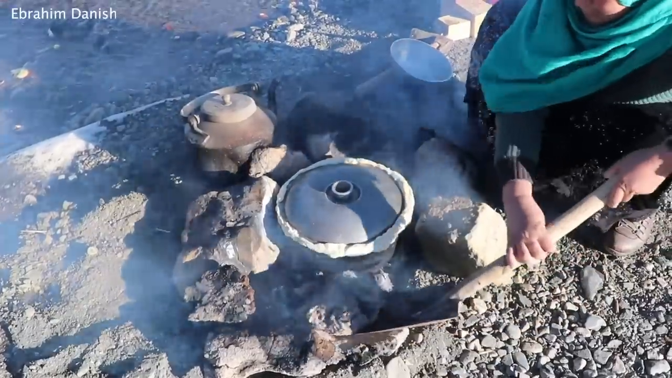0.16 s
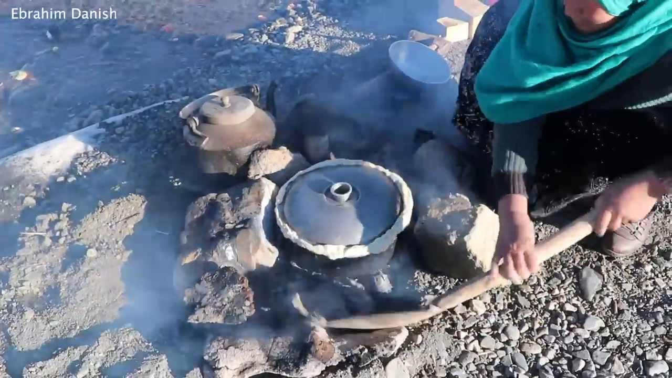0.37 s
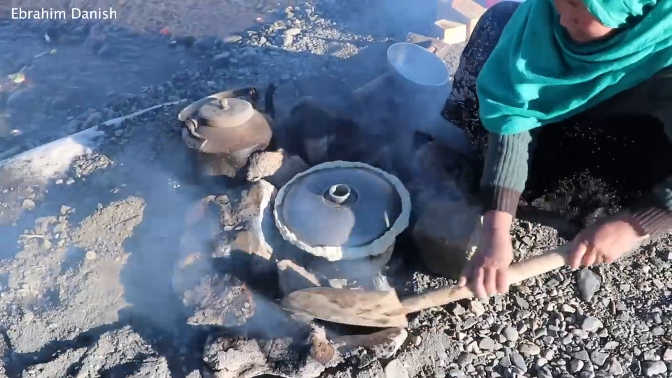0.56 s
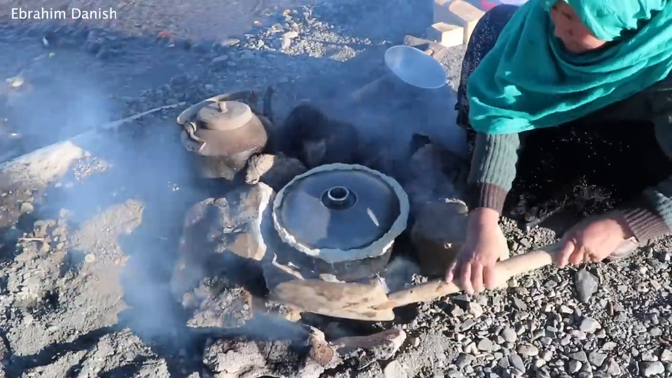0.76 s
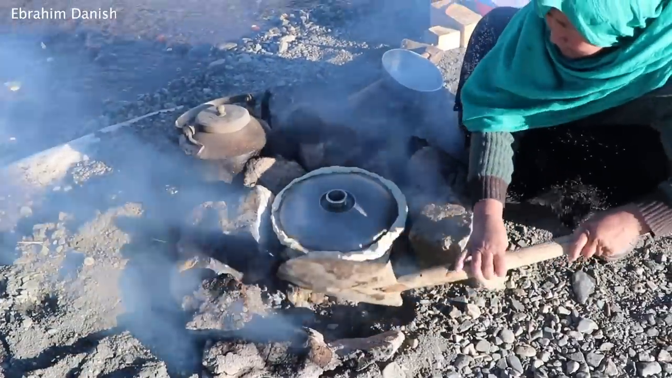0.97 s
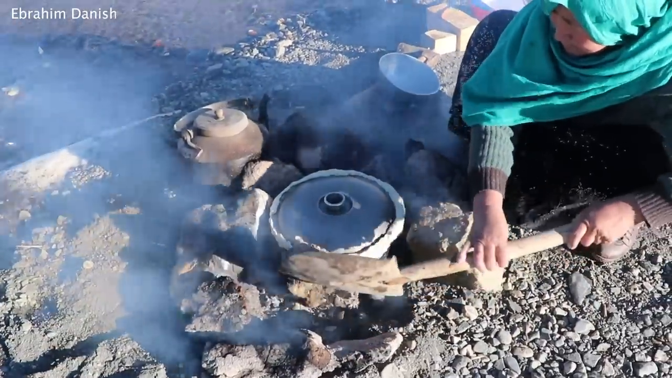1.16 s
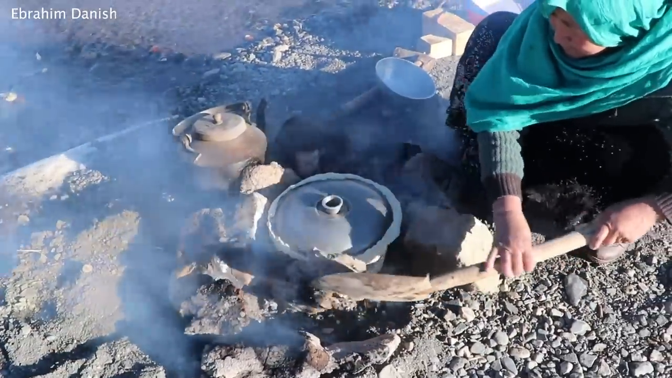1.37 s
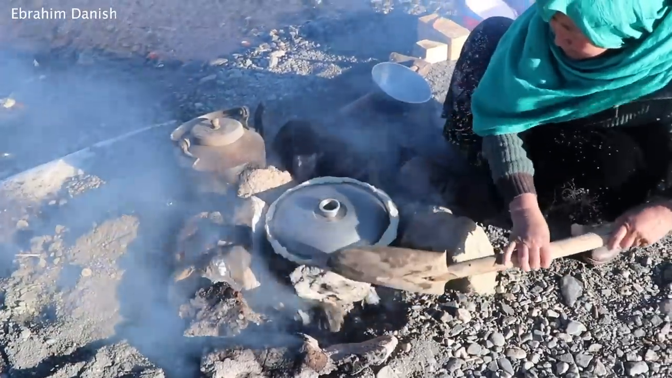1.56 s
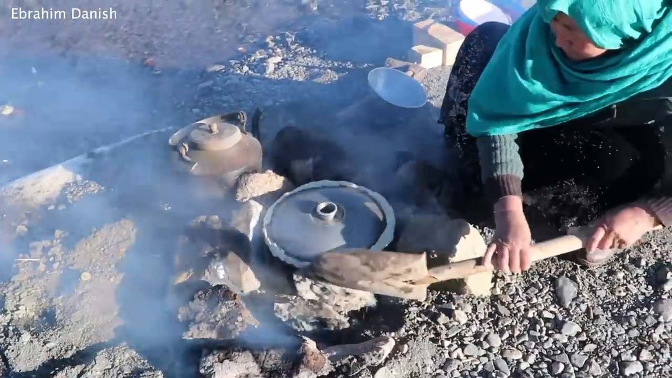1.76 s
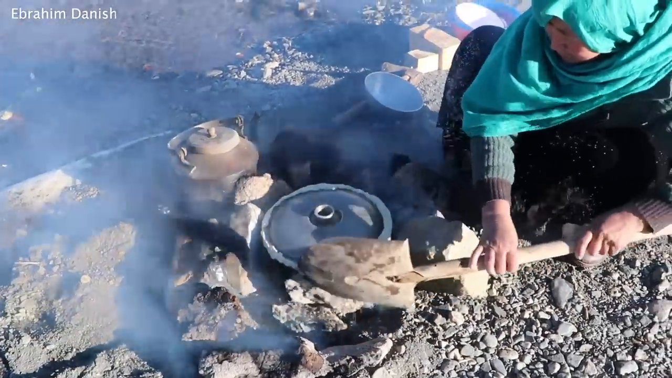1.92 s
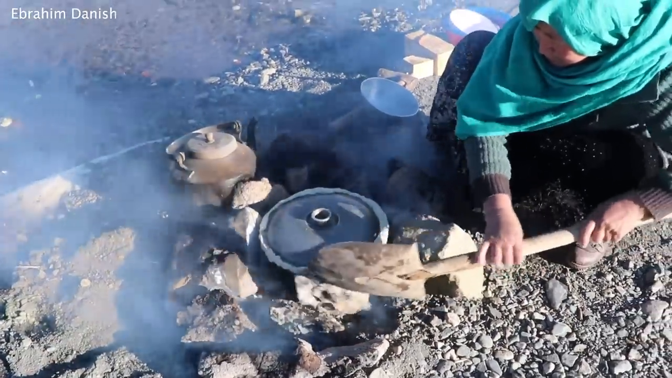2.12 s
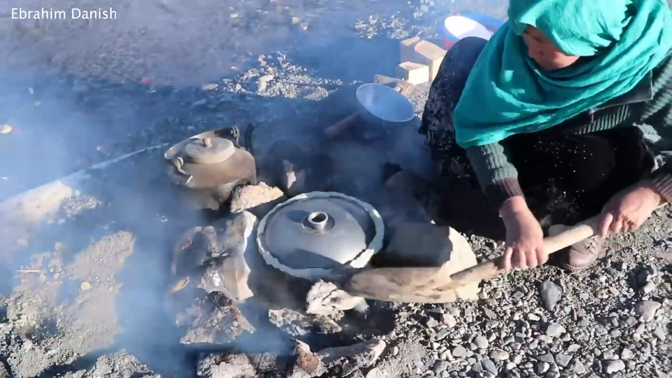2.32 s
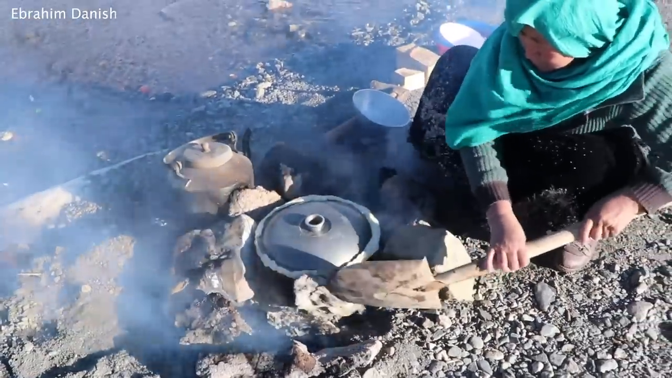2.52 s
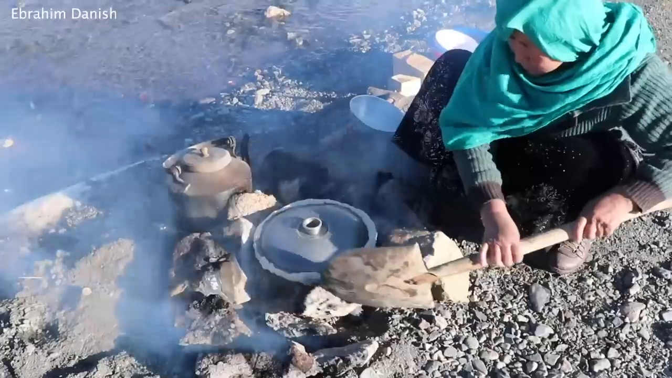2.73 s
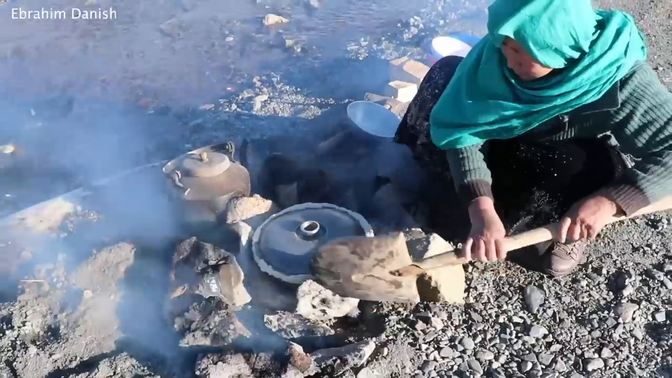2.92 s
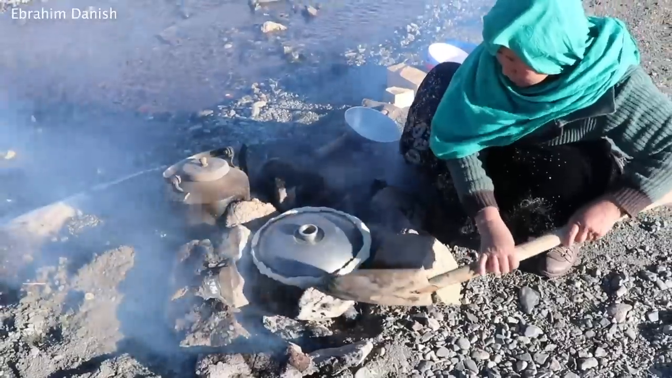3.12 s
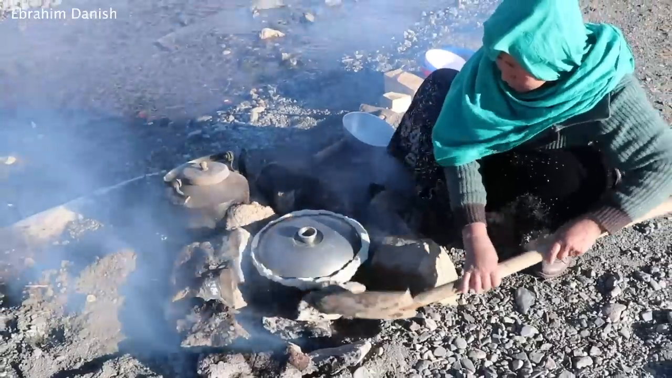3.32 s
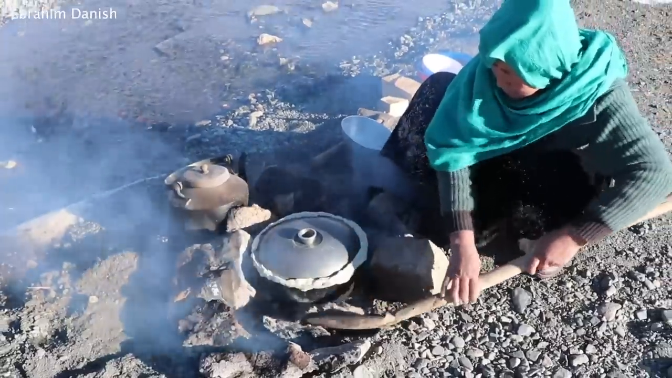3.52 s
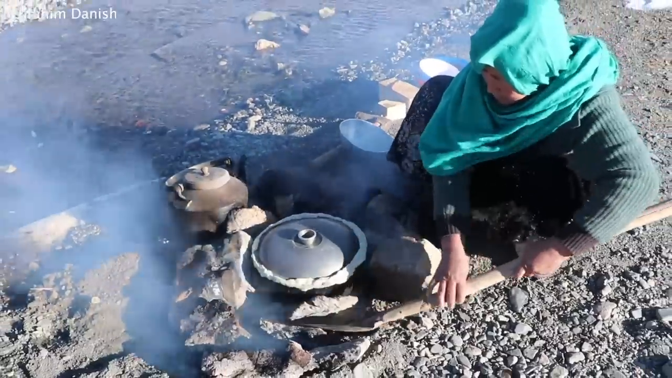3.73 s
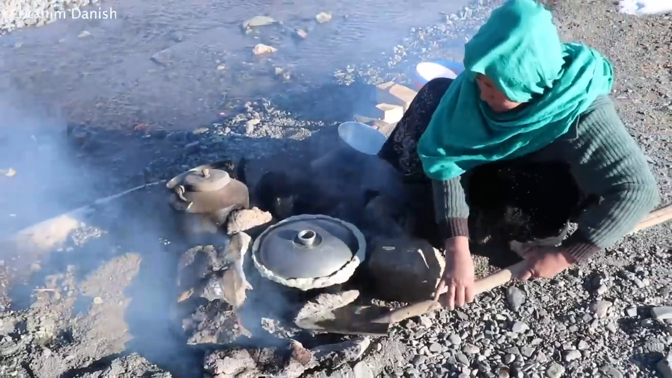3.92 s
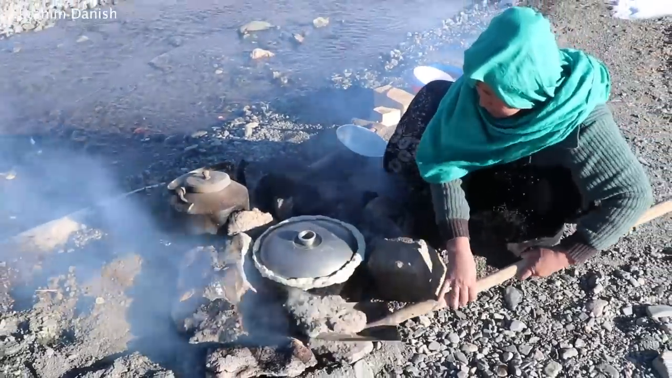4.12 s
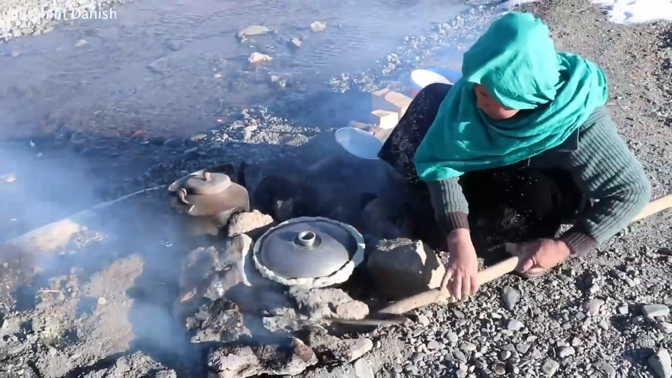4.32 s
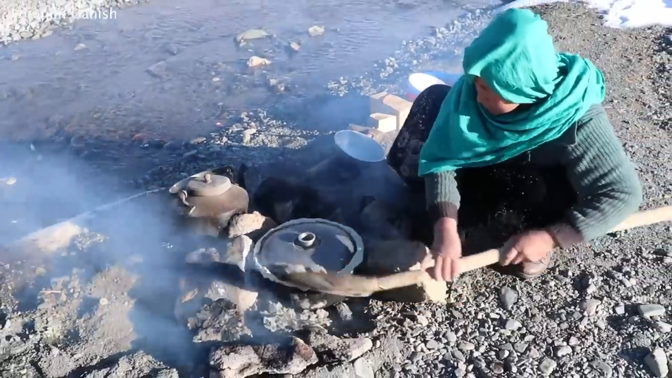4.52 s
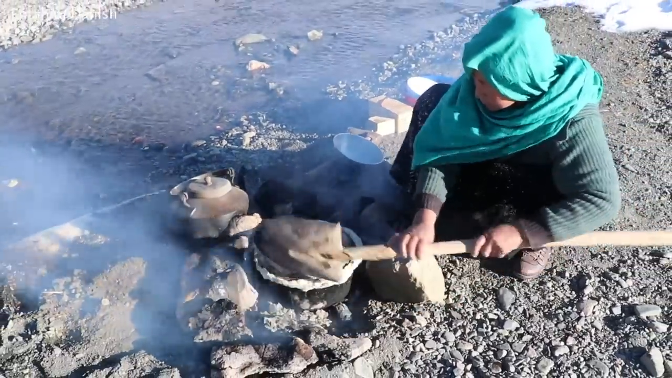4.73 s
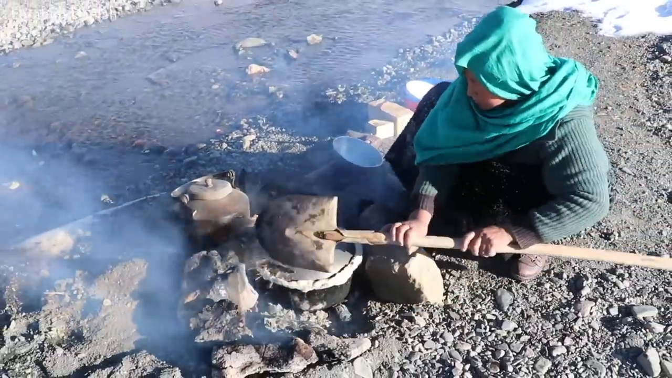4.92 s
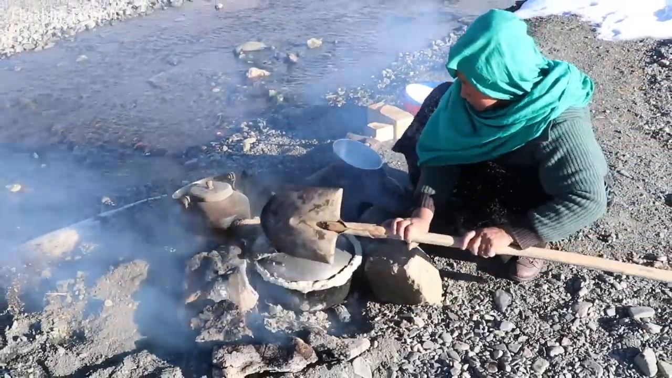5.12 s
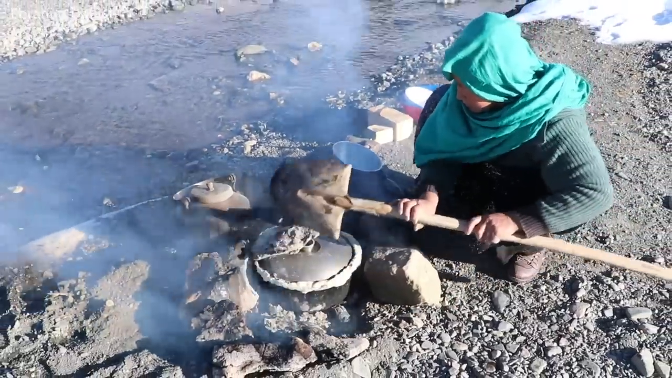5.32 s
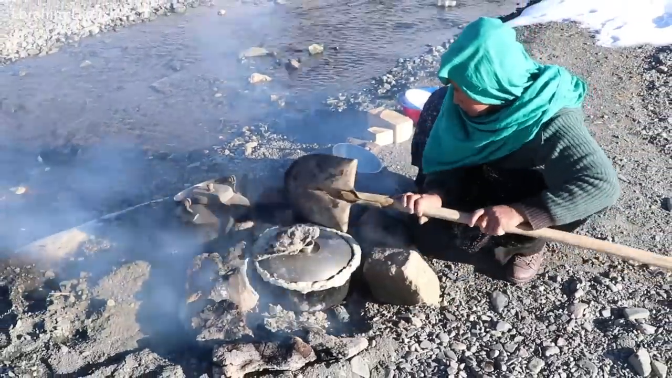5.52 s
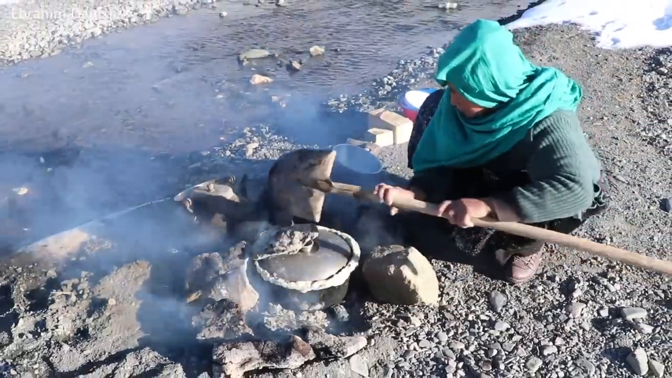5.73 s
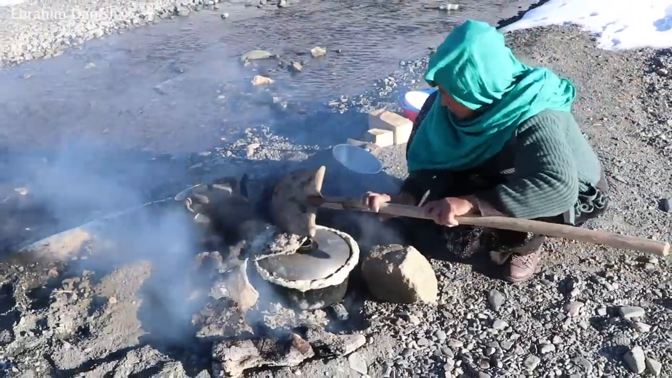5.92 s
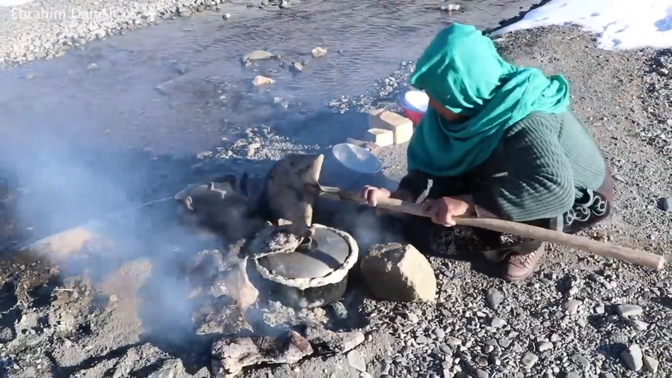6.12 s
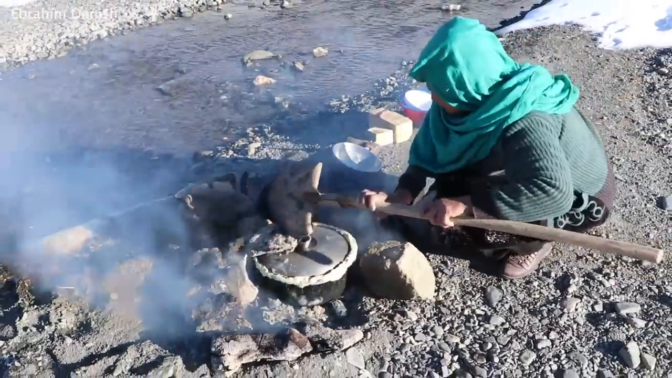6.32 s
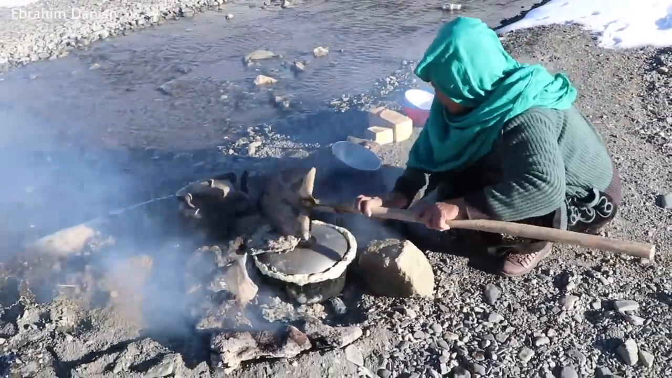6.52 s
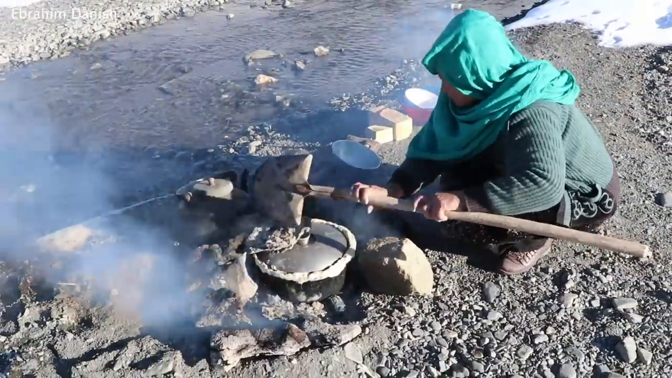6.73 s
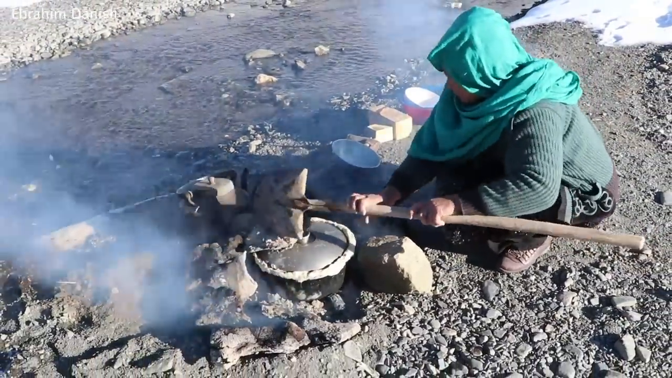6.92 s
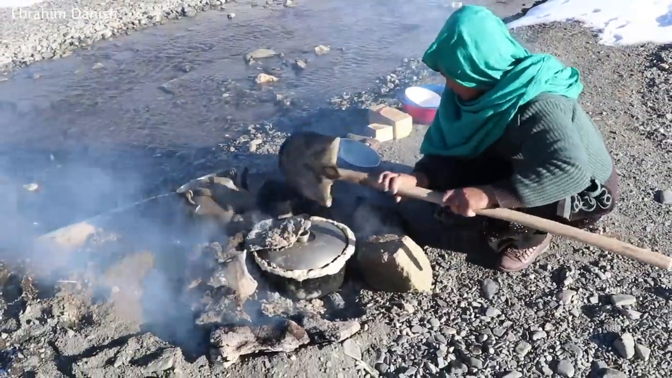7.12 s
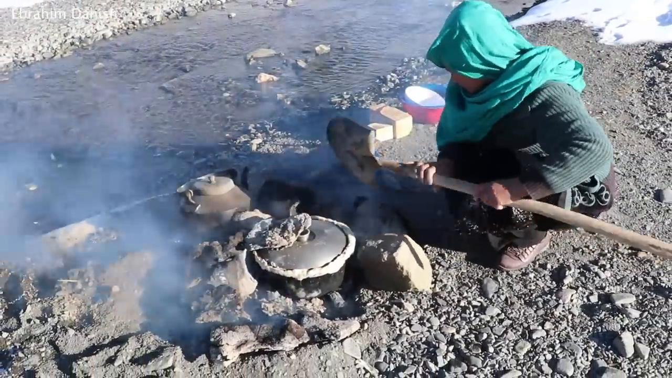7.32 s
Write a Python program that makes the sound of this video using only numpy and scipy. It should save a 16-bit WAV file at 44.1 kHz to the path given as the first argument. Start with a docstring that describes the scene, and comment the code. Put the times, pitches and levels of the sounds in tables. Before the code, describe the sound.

Close, gritty metal scrapes through gravel and ash, a few ringing clanks and four late taps, with ember snaps and quiet rippling water outdoors.

```python
"""A steel shovel scoops embers and gravel from an open fire, tips them on a pot lid and is tapped clean.
Close to the two microphone ports, random grit contacts and blows excite the blade's decaying modes.
From the fire, embers snap and charred lumps knock as filtered noise bursts; narrow noise bands sizzle.
Behind the fire runs a shallow stream of rippling filtered noise, over a low rumble of outdoor air."""
import sys
import numpy as np
from scipy import signal
from scipy.fft import rfft, irfft, next_fast_len
from scipy.io import wavfile
from scipy.ndimage import map_coordinates

SR = 44100
rng = np.random.default_rng(int(sys.argv[2]) if len(sys.argv) > 2 else 0)


def wav_out(sig):
    """Save sig, one row per channel (or a flat mono array), as 16-bit PCM at SR to the path in sys.argv[1]."""
    wavfile.write(sys.argv[1], SR, np.round(np.clip(np.atleast_2d(sig).T, -1, 1) * 32767).astype(np.int16))


N = 325458  # length [samples]


def amp(db):
    """Decibels to gain."""
    return 10 ** (np.asarray(db) / 20)


def unit(x):
    """Scale to rms 1."""
    return x / np.sqrt(np.mean(x ** 2) + 1e-20)


def normed(x):
    """Scale each channel to energy 1."""
    return x / np.sqrt(np.sum(x ** 2, axis=-1, keepdims=True) + 1e-20)


def along(points, hz):
    """Read (frequency, value) points on a log frequency axis."""
    f, v = np.transpose(points)
    return np.interp(np.log(hz + 1), np.log(f + 1), v)


def curves(rows):
    """One value per sample for each column after the time."""
    s, *cols = np.transpose(rows)
    return [np.interp(np.arange(N) / SR, s, c) for c in cols]


def wobble(rate):
    """A smooth random curve with the given rate of knots a second."""
    knots = rng.standard_normal(int(N * rate / SR) + 4)
    return map_coordinates(knots, [np.arange(N) * rate / SR])


def filtered(x, gain):
    """Causal (minimum-phase) filter with the given gain of frequency."""
    m = min(2 * next_fast_len(x.shape[-1]), 16384)
    log_gain = np.log(np.maximum(gain(np.fft.rfftfreq(m, 1 / SR)), 1e-6))
    # folding the cepstrum onto positive times makes the phase minimum
    cepstrum = irfft(log_gain, m)
    cepstrum[1:m // 2] *= 2
    cepstrum[m // 2 + 1:] = 0
    kernel = irfft(np.exp(rfft(cepstrum)), m)[:m // 2]
    return signal.fftconvolve(np.atleast_2d(x), kernel[None], axes=1)[:, :x.shape[-1]]


def add(track, s, sound):
    """Mix a sound into a track at time s."""
    part = track[:, max(round(s * SR), 0):][:, :sound.shape[-1]]
    part += sound[:, :part.shape[-1]]


def ports(pair, alike, side_db):
    """The first signal feeds both microphone ports, the second only the left, by likeness and balance."""
    m = next_fast_len(N + SR // 4)
    hz = np.fft.rfftfreq(m, 1 / SR)
    a, b = rfft(pair, m)
    likeness = np.clip(along(alike, hz), 0, 1)
    left = likeness * a + np.sqrt(1 - likeness * likeness) * b
    right = a * amp(-along(side_db, hz))
    return irfft(np.array([left, right]), m)[:, :N]


# colour of the stream behind the fire: (frequency [Hz], relative density [dB per Hz])
STREAM_COLOUR = [(100, -14.5), (250, -9), (400, -2), (620, -7), (800, -0.5), (1000, -4.5), (1700, 0),
                 (3000, -1), (4800, -8.5), (6400, -3.5), (8000, -6.5), (10500, -6.5), (16000, -16)]
# likeness of the stream at the two microphone ports: (frequency [Hz], likeness [0-1])
STREAM_LIKENESS = [(200, 0.94), (500, 0.99), (1000, 0.42), (10000, 0.014)]
# colour of the low outdoor air: (frequency [Hz], relative density [dB per Hz])
RUMBLE_COLOUR = [(11, -19), (18, -3), (43, 3), (59, 2), (118, -10), (251, -13.5), (300, -16.5),
                 (390, -34.5), (660, -120)]


def outdoors():
    """The stream is rippling noise, mostly unlike at the ports in the treble; the rumble is nearly common."""
    water = filtered(rng.standard_normal((2, N)), lambda hz: amp(along(STREAM_COLOUR, hz)))
    water = unit(ports(water, STREAM_LIKENESS, side_db=[(1000, -1.4), (10000, -0.23)]))
    ripple_db = 0.78 * wobble(5.14) + 1.9 * wobble(59)
    air = rng.standard_normal(N) + 0.095 * rng.standard_normal((2, N))
    rumble = unit(filtered(air, lambda hz: amp(along(RUMBLE_COLOUR, hz))))
    return water * amp(-57.0 + ripple_db) + amp(-59.5) * rumble


# short narrow hisses among the embers:
# (centre time [s], length between 1/e points [s], relative level [dB], centre [Hz], width [octaves])
SIZZLE_EVENTS = [(0.349, 0.03, -46.5, 2820, 0.21), (2.05, 0.17, -57.5, 8400, 0.066),
                 (4.003, .12, -54.5, 3070, 0.22), (5.222, 0.029, -53, 1710, 0.33),
                 (5.591, 0.032, -48.5, 3370, 0.38), (5.669, 0.037, -55, 3850, 0.088),
                 (7.3, 0.17, -64, 8540, .06)]


def sizzles():
    """Narrow bands of noise swell and fade in a bell shape, stronger at the right port."""
    out = np.zeros((2, N))
    t = np.arange(SR // 4) / SR - 1 / 8
    for s, length, db, centre_hz, octaves in SIZZLE_EVENTS:
        noise = rng.standard_normal((2, len(t)))
        hiss = unit(filtered(noise, lambda hz: 1 / (1 + (np.log2((hz + 1) / centre_hz) / octaves) ** 2)))
        swell = np.exp(-(2 * t / length) ** 2)
        add(out, s + t[0], amp(db + np.array([[-2], [2]])) * hiss * swell)
    return out


def pop(centre_hz, pan_db, octaves, t60, tail_db, tail_t60, apart):
    """A brief fracture or contact around one pitch, peak 1 before panning, with scatter from the stones."""
    t = np.arange(SR // 32) / SR
    decay = amp(-60 * t / t60)
    burst = amp(4.5) * normed(rng.standard_normal(len(t)) * decay)
    burst[0] += 1  # the first contact, followed by crumbling
    # a part that differs between the ports, then the scatter
    burst = burst + apart * normed(rng.standard_normal((2, len(t))) * decay)
    burst += amp(tail_db) * normed(rng.standard_normal((2, len(t))) * amp(-60 * t / tail_t60))
    sound = filtered(burst, lambda hz: 1 / (1 + (np.log2((hz + 1) / centre_hz) / octaves) ** 2) ** 3)
    sides = amp([[pan_db / 2], [-pan_db / 2]])
    return sound / np.abs(sound).max() * sides / sides.mean()


# sharp snaps of embers and chips, before a short common delay:
# (time [s], relative peak [dB], centre [Hz], left-right [dB])
EMBER_SNAPS = [(0.256, -30, 3310, -7.5), (0.2956, -21, 15200, -18), (0.393, -31, 6940, 5),
               (0.419, -33, 5830, -13), (1.2058, -20, 6320, -11), (1.6156, -25, 6560, -14),
               (1.6747, -25.5, 3270, -10), (1.945, -34.5, 3280, -13), (2.1961, -27.5, 6900, -2),
               (2.2996, -17, 5200, -18), (3.039, -31.5, 5280, -1), (3.6532, -16.5, 9900, -15),
               (3.7306, -24, 3320, -3), (4.1627, -20.5, 6340, -2), (4.281, -22.5, 7800, 2),
               (4.595, -24.5, 9550, -1), (5.2584, -32, 5990, -17), (5.3312, -26, 10300, -13),
               (5.4667, -38, 4810, -1), (6.763, -29.5, 9200, -5), (6.9004, -30.5, 3940, -3)]
# dull knocks of charred lumps and pebbles, before a short common delay:
# (time [s], relative peak [dB], centre [Hz], left-right [dB], relative width [octaves])
LUMP_KNOCKS = [(0.385, -31, 1440, -20, 3.5), (0.63, -34, 1620, -20, 4.4), (0.796, -43.5, 784, -21, 2.8),
               (0.856, -39.5, 1120, -18, 3.4), (1.259, -44.5, 755, -19, 2.3),
               (1.406, -39.5, 1040, -23, 1.9), (1.507, -47, 560, -2, 1.9), (1.597, -28, 1470, -31, 2.2),
               (1.605, -33, 1160, -33, 2.6), (1.784, -37, 1060, -22, 2.3), (1.8934, -30.5, 1600, -28, 2),
               (1.911, -40.5, 1410, -14, 3.4), (2.136, -39, 1450, -2, 2.2), (2.524, -28.5, 1310, 4, 0.81),
               (3.279, -32.5, 1360, -1.0, 6), (3.921, -47, 930, -13, 1.7), (3.949, -47, 910, -20, 1.9),
               (4.104, -45.5, 1180, -1, 0.6), (4.124, -43, 1290, 0.5, 0.45), (4.158, -34.5, 1240, 9, 2.6),
               (5.04, -36, 1140, -1, 1.9), (5.466, -32, 760, -1, 5.7), (5.755, -48.5, 1080, -3, 0.5),
               (6.15, -44.5, 756, -12, 1.6), (6.206, -39.5, 1380, -6, 3.4), (6.323, -42.5, 1100, 1, 1.2),
               (6.487, -34, 1830, -7, 0.93), (6.502, -39, 1600, 2, 0.58), (6.558, -35.5, 1770, -2, 1.7)]


def embers():
    """Snaps and dull knocks are filtered bursts; knocks shed crumbs, and random crackle fills the fire."""
    out = np.zeros((2, N))
    for s, db, hz, pan_db in EMBER_SNAPS:
        snap = pop(hz, pan_db, octaves=2.22, t60=0.002, tail_db=-3, tail_t60=0.044, apart=0.44)
        add(out, s + 0.0011, amp(db - 2.0) * snap)
    for s, db, hz, pan_db, octaves in LUMP_KNOCKS:
        knock = pop(hz, pan_db, 0.83 * octaves, t60=0.0068, tail_db=-2.0, tail_t60=0.033, apart=0.49)
        add(out, s + 0.002036, amp(db + 4.0) * knock)
        for delay, pitch, size in rng.random((3, 3)):
            crumb_hz = hz * 2 ** (pitch - 0.6)
            crumb = pop(crumb_hz, pan_db, octaves=1.45, t60=0.01, tail_db=-5, tail_t60=0.028, apart=0.54)
            add(out, s + 0.006 + 0.033 * delay, amp(-58.5 + 5.6 * size) * crumb)
    for when, size, pitch, side in rng.random((70, 4)):
        tick_hz, pan_db = 1100 * 9 ** pitch, 10 * (side - 0.7)
        tick = pop(tick_hz, pan_db, octaves=1.63, t60=0.0014, tail_db=-8.5, tail_t60=0.02, apart=0.71)
        add(out, when * N / SR, amp(-50.5 + 18 * size ** 2 + 5 * pitch) * tick)
    return out


# modes of the unloaded steel blade, also weighted in blade():
# (frequency [Hz], relative strength [dB], undamped t60 [s])
BLADE_MODES = [(1432, -8, 0.18), (1518, -8, 0.25), (1604, -4, 0.35), (1768, -6, 0.2), (1852, -3, 0.35),
               (2078, 6.5, 0.5), (2379, -1, 0.65), (2724, 1, 0.3), (2810, -5, 0.18), (2939, -3.5, 0.35),
               (3122, -9, 0.18), (3327, -7, 0.18), (3499, -3, 0.18), (3725, -8, 0.18), (4070, -8, 0.15),
               (4253, -7, 0.4), (4620, -7, 0.26), (4834, -12, 0.3), (5060, -13, 0.18), (5545, -5, 0.38),
               (5975, -8, 0.18), (6385, 0, 0.2), (6718, -7, 0.18), (10142, -16, 0.18), (10325, -17, 0.18),
               (10573, -17, 0.18)]


def modes(damping):
    """Each mode of the blade as a decaying phasor of energy 1; damping shortens every decay."""
    hz, _, t60 = np.transpose(BLADE_MODES)[:, :, None]
    t = np.arange(SR // 3) / SR
    return normed(amp(-60 * t * damping / t60)) * np.exp(2j * np.pi * hz * t)


def blade(phasors, colour, tilt_db, ring_hz, ring_db, dense_db, dense_t60):
    """Two versions of the blade's answer to a contact: a click, a short dense clang and lasting modes."""
    t = np.arange(SR // 12) / SR
    body = amp(dense_db) * normed(rng.standard_normal((2, len(t))) * amp(-60 * t / dense_t60))
    # the click comes 3 samples later in the second signal, which ports() blends into the left port only
    body[0, 0] += 1
    body[1, 3] += 1

    def body_gain(hz):
        """Colour of the contact, tilted in dB per octave between 1 and 12 kHz."""
        return amp(along(colour, hz) + tilt_db * np.log2(np.clip(hz, 1000, 12000)))

    body = normed(filtered(body, body_gain))
    # the place of contact decides which modes take up the blow
    hz, db, _ = np.transpose(BLADE_MODES)
    strength = amp(db + rng.normal(0, 2, len(hz))) / (1 + (1.8 * np.log2(hz / ring_hz)) ** 2)
    phase = np.exp(2j * np.pi * rng.random((2, len(hz))))
    answer = amp(ring_db) * normed(((strength * phase) @ phasors).real)
    answer[:, :len(t)] += body
    return normed(answer)


def grains(size, rate, spread_db):
    """Tiny random contacts of very unequal strength, at a mean rate a second, rms 1."""
    hit = rng.random(size) < rate / SR
    strength = amp(spread_db * np.clip(rng.standard_normal(size), -2, 2))
    return unit(hit * rng.choice([-1, 1], size) * strength)


BITE_S, BUILD_DB = 0.011, 7.5  # time for the blade to bite [s]; gain over a push as the load piles up [dB]


def push(t, length, run_out_t60):
    """Force of one stroke: the blade bites, the load builds up, then the grit runs out."""
    build_db = BUILD_DB * (np.minimum(t / length, 1) - 1)
    run_out_db = -60 * np.maximum(t - length, 0) / run_out_t60
    return np.minimum(t / BITE_S, 1) * amp(build_db + run_out_db)


# colour of coarse grit on steel: (frequency [Hz], relative density [dB per Hz])
GRIT_COLOUR = [(300, -46), (800, -27.5), (1150, -17.5), (1500, -0.5), (2100, -6), (3000, 2), (3900, -4),
               (5200, 1), (6500, 7.5), (7300, -3.5), (8200, -23), (12000, -51)]
# colour of fine ash on steel: (frequency [Hz], relative density [dB per Hz])
ASH_COLOUR = [(3000, -62), (6500, -26), (7900, -1.5), (9200, 3.5), (10500, 3.5), (12000, -4.5), (14000, -6),
              (16000, -18)]


def grit(phasors, force, ash_db, tilt_db, ring_hz, ring_db):
    """Grit catches and slips on the blade under the given force; fine ash hisses on top."""
    size = len(force)
    # slow and fast stick-slip [knots a second]
    knots = [np.arange(size) * rate / SR for rate in (60, 260)]
    slow, fast = [np.interp(k, np.arange(300), rng.standard_normal(300)) for k in knots]
    force = force * amp(3.5 * slow + 1.06 * fast - 3.0)
    # single larger grains stand out in both coarse grit and ash
    stones = amp(-9.5) * grains(size, rate=130, spread_db=5.5)
    coarse = force * unit(grains(size, rate=5000, spread_db=7.5) + stones)
    fine = force * amp(ash_db - 0.5) * unit(grains(size, rate=7000, spread_db=14) + stones)
    clang = blade(phasors, GRIT_COLOUR, tilt_db, ring_hz, ring_db, dense_db=1.5, dense_t60=0.024)
    hiss = blade(phasors, ASH_COLOUR, tilt_db=-7.5, ring_hz=11000, ring_db=-31, dense_db=2, dense_t60=0.034)
    return signal.fftconvolve(coarse[None], clang, axes=1) + signal.fftconvolve(fine[None], hiss, axes=1)


# grit shaken loose by a blow: base level [dB], gain per dB of blow [dB], onset [s], run-out t60 [s]
SPILL_DB, SPILL_GROWS, SPILL_RISE_S, SPILL_T60 = -34.5, 0.75, 0.0061, 0.52
# pushes of the blade through grit: (start [s], push length [s], relative final level [dB],
# run-out t60 [s], relative fine ash level [dB], tilt [dB per octave],
# frequency around which it rings most [Hz], relative ring level [dB])
SHOVEL_STROKES = [(0.0, 0.047, -38.5, 0.28, -4.5, -2, 3200, -8.5),
                  (0.11, 0.46, -49, .4, -11.5, -1.5, 3260, -9.5),
                  (0.498, 0.024, -31.5, 0.15, -6.5, -3.5, 1740, -15),
                  (0.55, 0.05, -42.5, 0.65, -9, -3, 3200, -9),
                  (0.835, 0.015, -52.5, 0.58, -10.5, 3, 3300, -6),
                  (0.984, 0.026, -45, 1, -11, -2.5, 3420, -2.5),
                  (1.07, 0.049, -40.5, 0.19, -9, -0.5, 3270, -6),
                  (1.215, 0.12, -52.5, 0.52, -11, 0.5, 3140, -7.5),
                  (1.44, 0.14, -46.5, 0.056, -9.5, -1.5, 2820, -1.5),
                  (1.69, .07, -46, 0.35, -13.5, -5, 2570, -5), (1.95, 0.062, -57.5, 1, -15, -3, 2400, -3.5),
                  (2.19, 0.14, -45.5, 0.42, -12, -6, 2700, -7),
                  (2.335, 0.017, -37, 0.32, -10.5, -1.5, 3180, -6),
                  (2.402, 0.033, -39.5, 0.2, -11.5, -3, 2000, -2.5),
                  (2.664, 0.031, -40, 0.14, -15, -0.5, 2460, 2.5),
                  (3.04, 0.32, -49, .3, -11, -2, 3130, -1.5),
                  (3.33, 0.039, -40.5, 0.079, -13, -3.5, 3450, 2.5),
                  (3.535, 0.018, -42, 0.12, -11, -2, 4500, -4),
                  (3.624, 0.052, -43, 0.43, -9, -5.5, 4080, -10),
                  (3.861, 0.21, -61, .3, -10, -8, 3460, -11),
                  (4.044, 0.018, -48, 0.41, -11.5, -4.5, 3300, -7.5),
                  (4.175, 0.032, -42.5, 0.18, -12.5, -5.5, 3200, -11),
                  (4.801, 0.034, -49.5, 0.31, -15.5, -6, 2040, -3),
                  (4.89, .12, -48, 0.45, -15.5, -3.5, 2100, 1),
                  (5.085, 0.023, -43, 0.27, -14.5, -6.5, 3660, -3),
                  (6.165, 0.035, -53.5, 0.13, -9.5, -8, 2200, -8), (6.355, 0.029, -59, 1, -12, -3, 2300, 0)]


def scrape():
    """Each stroke drags the blade through the load, and each blow sends loose grit sliding over it."""
    out, t = np.zeros((2, N)), np.arange(SR // 2) / SR
    phasors = modes(damping=2.25)  # the load damps the blade
    for s, length, db, t60, ash_db, tilt_db, ring_hz, ring_db in SHOVEL_STROKES:
        force = amp(db) * push(t, length, t60)
        add(out, s, grit(phasors, force, ash_db, tilt_db, ring_hz, ring_db))
    slide = np.minimum(t / SPILL_RISE_S, 1) * amp(-60 * t / SPILL_T60)
    for s, db, _, _, ring_hz, _ in BLADE_BLOWS:
        force = amp(SPILL_DB + SPILL_GROWS * db) * slide
        add(out, s, grit(phasors, force, ash_db=-12, tilt_db=-4.5, ring_hz=ring_hz, ring_db=-9))
    return out


# colour of struck steel: (frequency [Hz], relative density [dB per Hz])
STEEL_COLOUR = [(200, -87), (600, -42.5), (1000, -14.5), (1500, -3), (2900, 4.5), (4000, -5), (5200, -3),
                (6400, 4.5), (8300, -10.5), (10500, -8.5), (13000, -18), (16000, -34.5)]
# the blade strikes stone or pot, also shaking grit loose in scrape():
# (time [s], relative level [dB], chatter t60 [s], tilt [dB per octave],
# frequency around which it rings most [Hz], relative ring level [dB])
BLADE_BLOWS = [(0.506, -30, 0.22, 5.5, 6000, -13), (0.519, -27, 0.095, 18, 6500, -25),
               (2.806, -19, 0.035, -3.5, 2150, 0), (2.907, -24, 0.064, -3, 2420, -15),
               (3.4, -24.5, 0.063, 0.5, 3550, -6.5), (3.480, -18, 0.048, 6, 6400, -29),
               (3.4854, -6.5, 0.031, 3, 6000, -21), (3.5685, -26.5, 0.032, 3.5, 6500, -7),
               (3.585, -29, 0.02, 9, 3000, -26), (4.067, -40.5, 0.049, 5, 3000, -14),
               (5.037, -27, 0.12, -4.5, 3900, -3), (5.89, -15.5, 0.036, -2, 4200, -15),
               (6.268, -12.5, 0.03, -3.5, 2210, -18), (6.622, -16.5, 0.041, -3, 5100, -22),
               (6.942, -21.5, 0.054, -2, 4030, -9.5), (6.949, -19.5, 0.024, -4, 2400, -14)]


def blows():
    """At each blow the edge chatters briefly on the hard surface and the undamped blade rings."""
    out, t, phasors = np.zeros((2, N)), np.arange(SR // 8) / SR, modes(damping=1)
    for s, db, t60, tilt_db, ring_hz, ring_db in BLADE_BLOWS:
        force = amp(-60 * t / t60) * (1 - np.exp(-t / 0.00042))
        chatter = normed(force * grains(len(t), rate=5000, spread_db=3)) * np.linalg.norm(force)
        answer = blade(phasors, STEEL_COLOUR, tilt_db, ring_hz, ring_db, dense_db=-2.5, dense_t60=0.048)
        add(out, s, amp(db - 5.5) * signal.fftconvolve(chatter[None], answer, axes=1))
    return out


# balance of the blade at the two microphone ports: (frequency [Hz], left-right [dB])
BLADE_SIDE = [(500, 3.5), (1500, -2.5), (3500, -9), (6000, -5.5), (9000, -10.5), (15000, -18.5)]
# likeness of the blade at the two microphone ports: (frequency [Hz], likeness [0-1])
BLADE_LIKENESS = [(500, 0.42), (3500, 0.79), (6500, 1), (9000, 0.85), (15000, 0.1)]
# delay of the blade at the left port: (time [s], left lag [microseconds])
BLADE_LAG = [(0, 40), (3.5, 37.5), (5, 27), (7, 23)]


def shovel():
    """The blade works right of centre, so its sound reaches the left port a little later."""
    left, right = ports(scrape() + blows(), BLADE_LIKENESS, BLADE_SIDE)
    lag = curves(BLADE_LAG)[0] * SR / 1e6  # in samples
    return np.array([map_coordinates(left, [np.arange(N) - lag], order=5), right])


def scene():
    """Stream and air behind, the fire in front, and the shovel at work in it."""
    return outdoors() + sizzles() + embers() + shovel()


TOP_HZ = 16300  # band limit of the recorder [Hz]


def record(dry):
    """The recorder clips at full scale, then keeps nothing above its band limit."""
    spectrum = rfft(np.clip(dry, -1, 1))
    return irfft(spectrum * (np.fft.rfftfreq(N, 1 / SR) < TOP_HZ), N)


dry = scene()
out = record(dry)
wav_out(out)
```